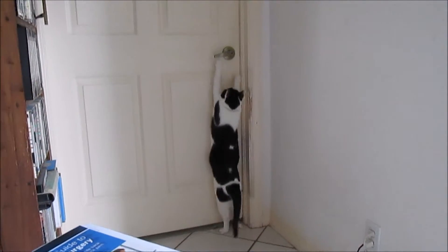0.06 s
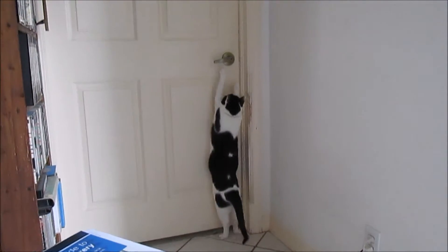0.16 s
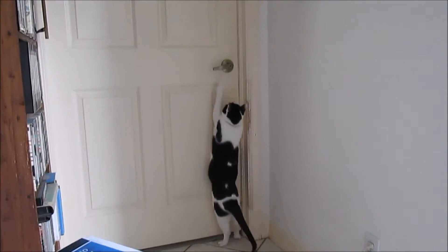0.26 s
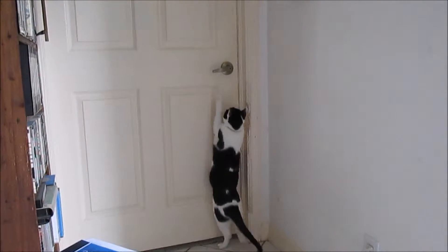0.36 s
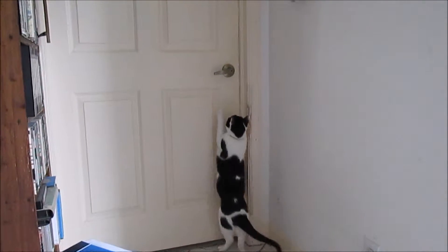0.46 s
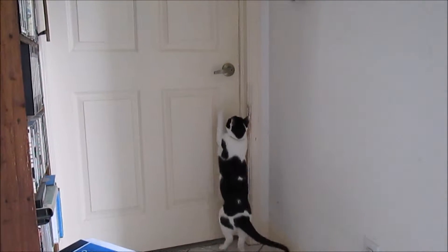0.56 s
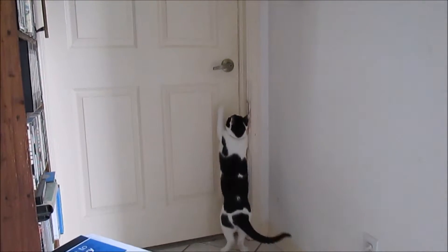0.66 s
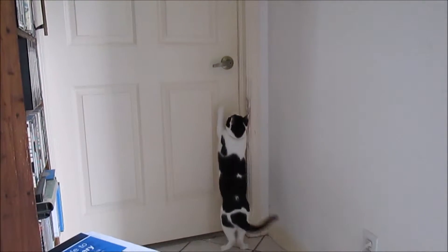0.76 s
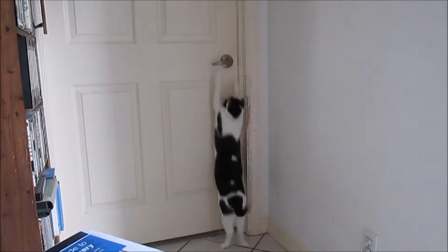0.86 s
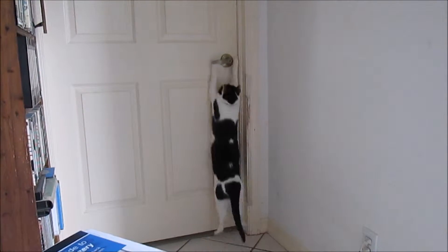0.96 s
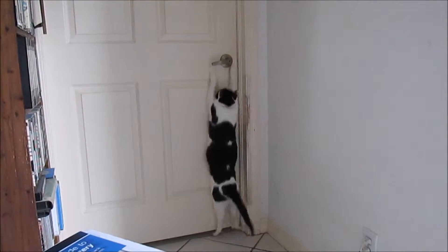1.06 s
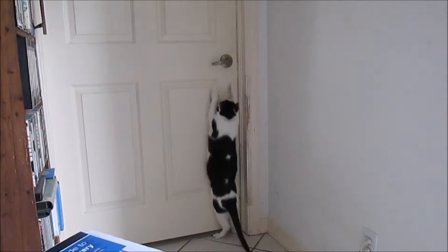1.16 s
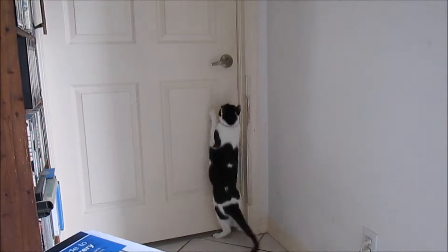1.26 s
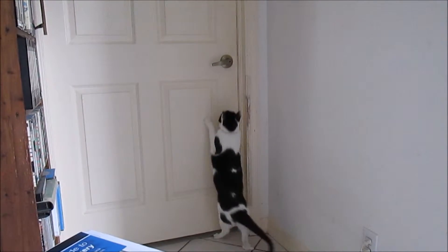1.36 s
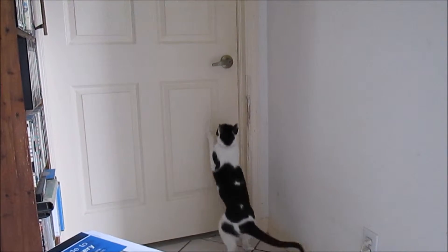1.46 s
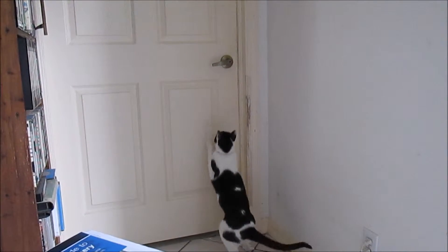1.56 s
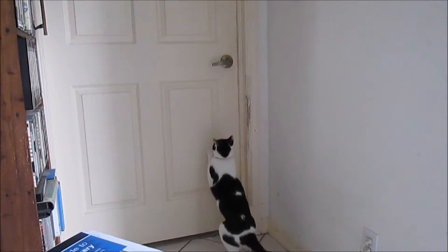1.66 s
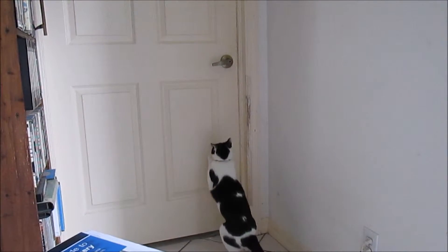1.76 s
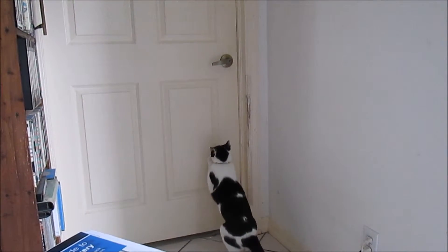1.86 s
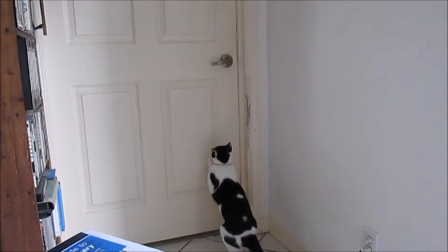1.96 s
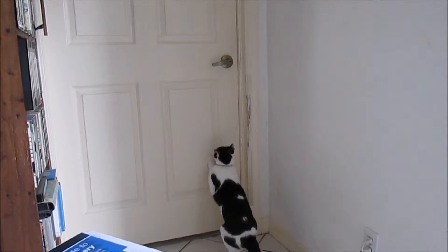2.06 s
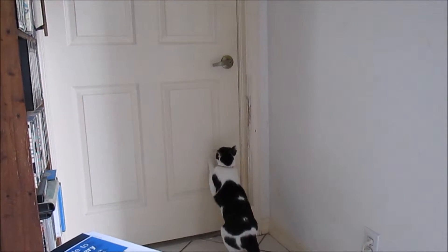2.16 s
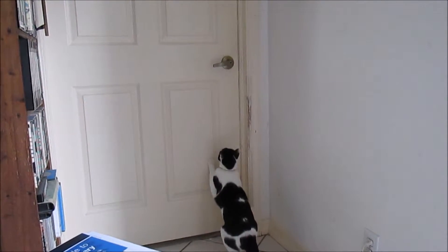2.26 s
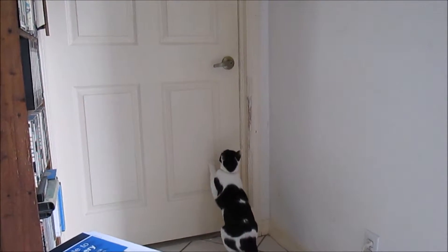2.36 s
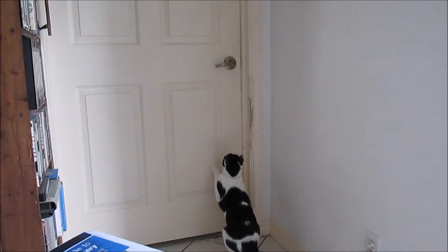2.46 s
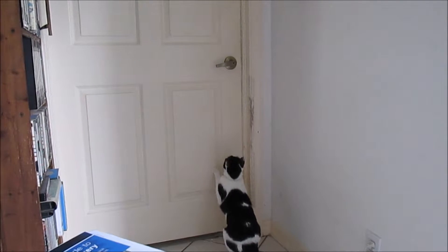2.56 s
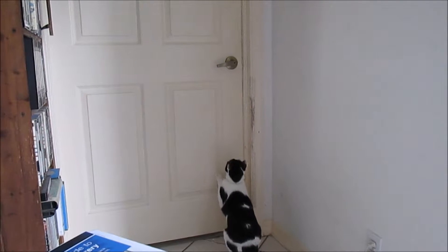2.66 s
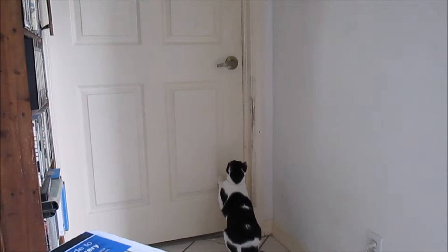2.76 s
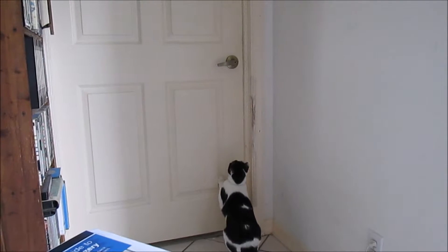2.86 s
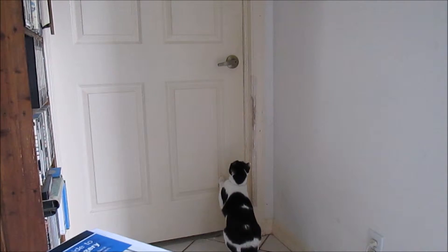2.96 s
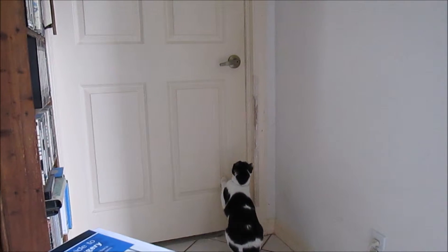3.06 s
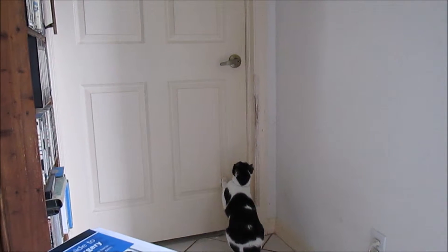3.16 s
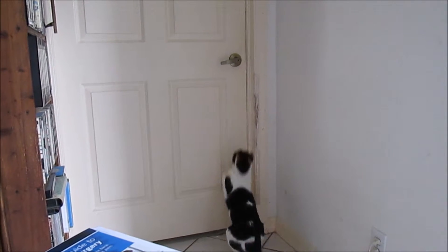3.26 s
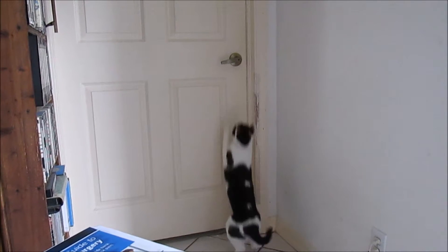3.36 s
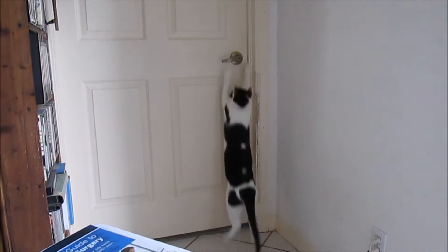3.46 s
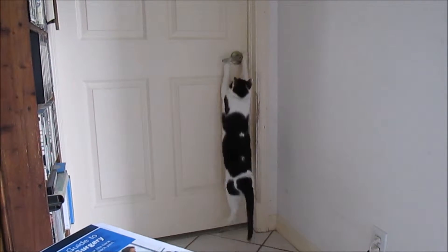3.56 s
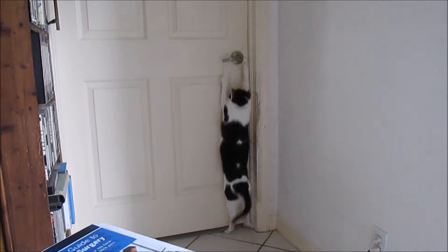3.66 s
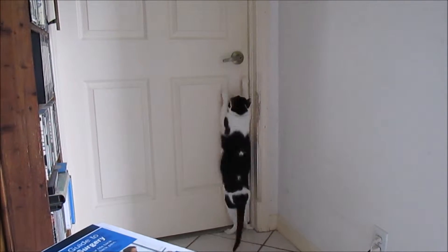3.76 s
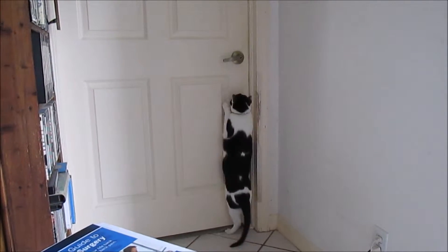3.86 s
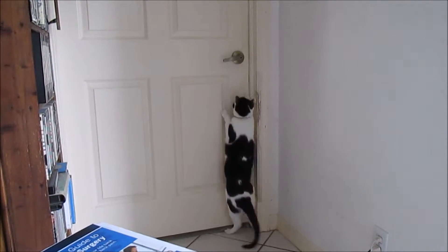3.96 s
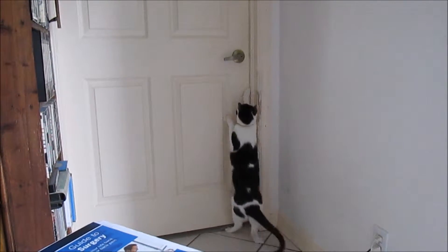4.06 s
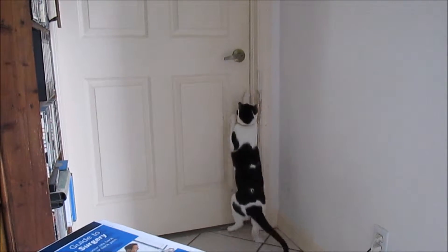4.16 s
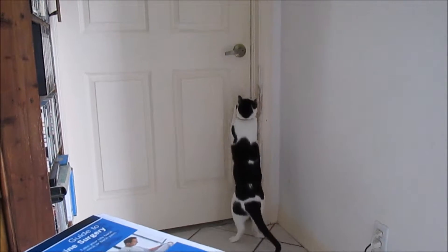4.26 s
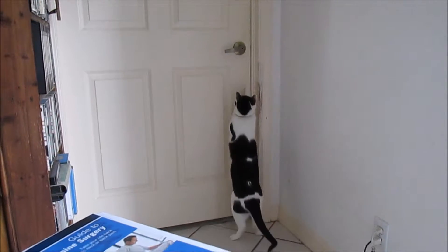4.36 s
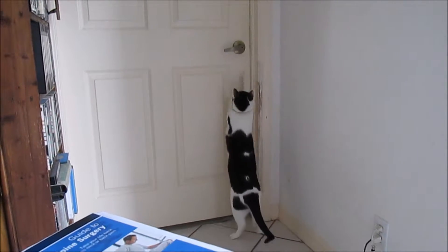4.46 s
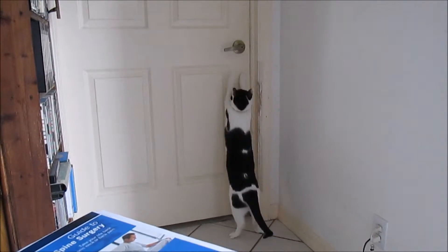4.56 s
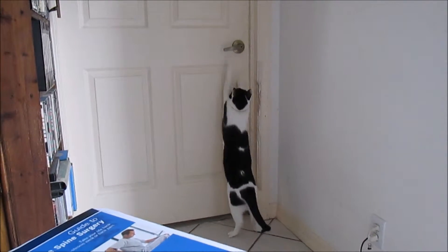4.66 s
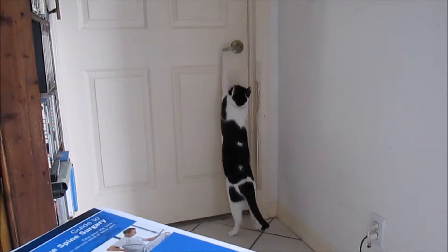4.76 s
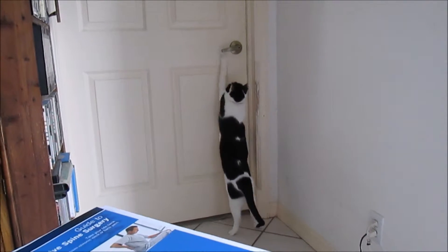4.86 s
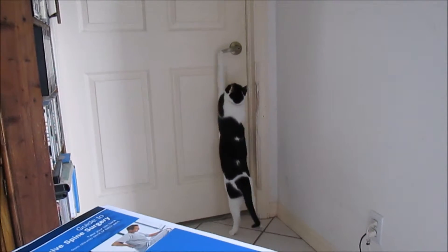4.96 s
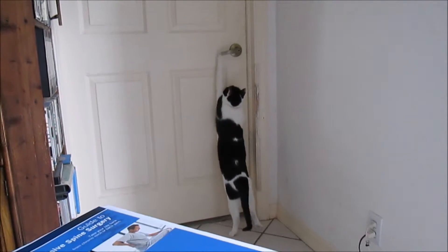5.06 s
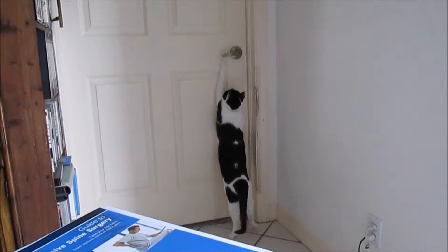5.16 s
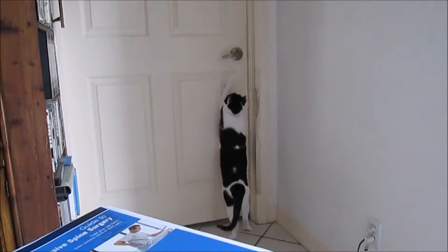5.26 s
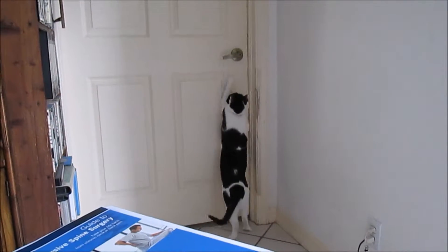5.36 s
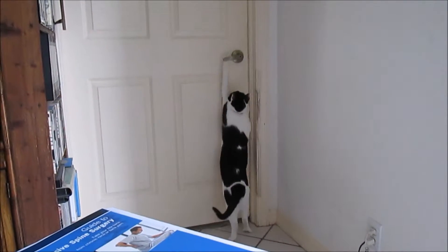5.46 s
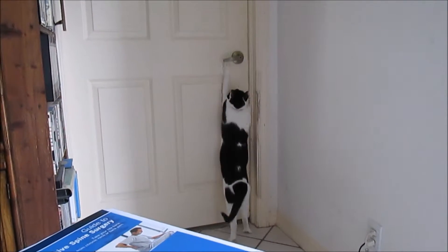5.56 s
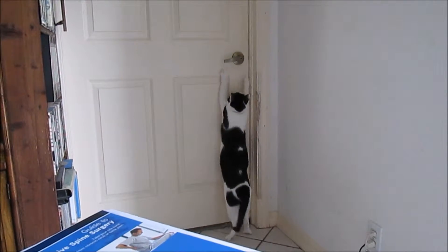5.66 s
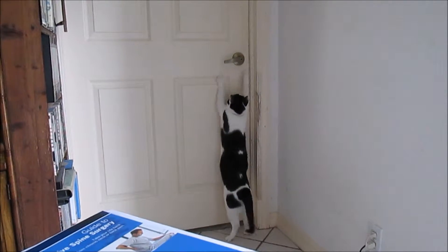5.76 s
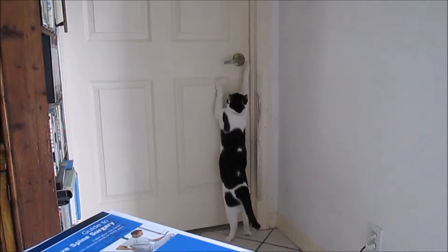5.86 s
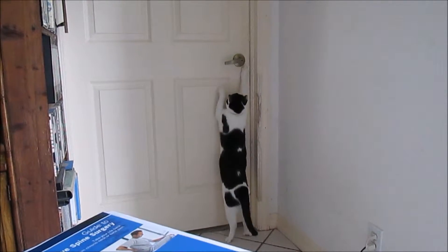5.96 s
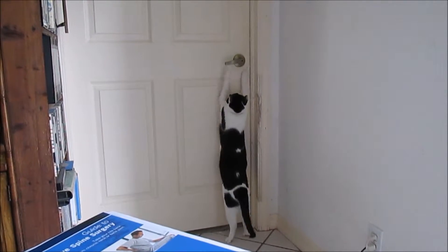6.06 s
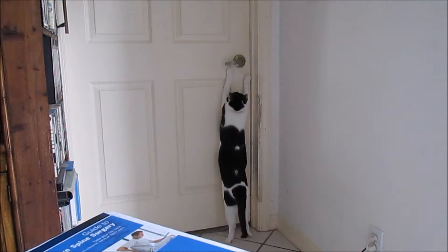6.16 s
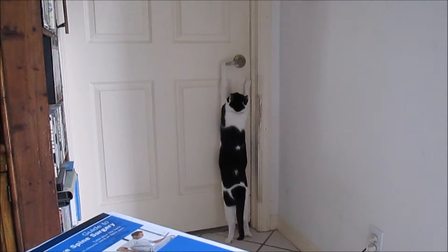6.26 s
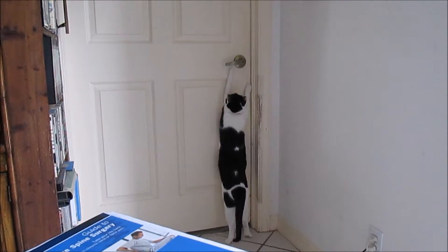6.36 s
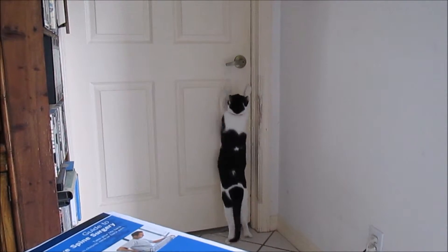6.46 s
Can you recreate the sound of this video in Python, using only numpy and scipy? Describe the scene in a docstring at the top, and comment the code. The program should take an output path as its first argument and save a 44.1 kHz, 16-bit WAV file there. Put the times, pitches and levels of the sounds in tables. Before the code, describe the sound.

A cat paws a hollow door indoors: claws tick and scrape, two bursts of knocks with a jingling collar bell, then scattered scratches over faint hum.

```python
"""A cat works at a hollow panel door in a small tiled hallway, heard in stereo from close by.
A few claw ticks and a hiss of sliding come first; at 1 s a leap knocks the panels hard and the collar bell jingles.
Light touches follow, then from 3.2 s a second flurry with more jingling, and from 4.6 s scattered paws and scratches.
Blows ring panel and bell modes, grains of noise make ticks and slides, slow sways shake the leaf.
Throughout lie the hum of the house, in shaped noise, and a thin whine, a wavering sine."""
import sys
import numpy as np
from scipy import signal
from scipy.fft import rfft, irfft, next_fast_len
from scipy.io import wavfile

SR = 44100
rng = np.random.default_rng(int(sys.argv[2]) if len(sys.argv) > 2 else 0)


def gain_from_db(level_db):
    """Turn a decibel level (scalar or array-like) into a linear amplitude factor."""
    decades = np.asarray(level_db, float) / 20
    return 10 ** decades


def dump(signal):
    """Clip the signal to [-1, 1] and save it as 16-bit WAV at the path in sys.argv[1]."""
    limited = np.clip(np.atleast_2d(signal).T, -1, 1)
    pcm = np.round(limited * 32767).astype(np.int16)
    wavfile.write(sys.argv[1], SR, pcm)


N = 286864


def door(rumble_db):
    """Every knock drives all panel modes afresh, most of all those near its place; rubbing drives the upper ones."""
    # blows of paws and knob: t/s, level/dB, brightness/(dB per octave around 600 Hz), favoured mode f/Hz
    knocks = [(0.038, -38.5, 8, 393), (0.987, -19, -12, 523), (0.995, -13, -7, 1320), (1.016, -20, -6, 535),
              (1.039, -20, -22, 630), (1.063, -18, -7, 740), (1.087, -14, -7, 604), (1.101, -6, 6, 670),
              (1.134, -17, -3, 680), (1.149, -28, -1, 664), (1.176, -26, -3, 810), (1.209, -30, 0, 810),
              (1.259, -30, 5, 1400), (1.276, -26, -18, 231), (2.569, -43, 20, 900), (2.675, -39, 4, 1150),
              (3.249, -37.5, 2, 1500), (3.429, -46, 5, 620), (3.639, -39, -10, 250), (3.756, -27, -23, 390),
              (3.764, -20, -16, 220), (3.79, -24.5, 1, 597), (3.83, -14, -13, 213), (3.842, -21.5, -5, 604),
              (3.852, -27, -26, 280), (3.897, -22.5, -20, 223), (3.949, -28.5, -33, 300),
              (4.008, -54, -8, 302), (4.078, -36, -3, 1150), (4.114, -39, -13, 236), (4.217, -43, 10, 1370),
              (4.262, -38, 16, 1260), (4.61, -32.5, 15, 1380), (4.885, -28, -4, 594), (5.057, -32, -9, 704),
              (5.163, -24, 8, 600), (5.219, -51, 0, 850), (5.574, -26.5, -9, 1250), (5.594, -25, -19, 800),
              (5.63, -25.5, -16, 380), (6.197, -28, 8, 1350), (6.225, -29, -12, 595), (6.243, -32, -6, 610),
              (6.259, -28.5, -10, 790), (6.381, -41, 3, 1280), (6.4, -17.5, 6, 630), (6.41, -21.5, 0, 970)]
    # modes of the door panels: f/Hz, level/dB, t60/s
    panels = [(206.2, -20, 0.6), (231.6, -10, 0.18), (293, -5, 0.1), (393, -2, 0.043), (480, -8, .05),
              (520, -7, 0.029), (576, -1, 0.11), (639.4, 2.5, 0.1), (715, 1.5, 0.055), (820, 6.5, 0.047),
              (970, 6, 0.059), (1116, -15, 0.15), (1087, -9.5, 0.14), (1180, 5.5, 0.027), (1341, 9, 0.026),
              (1569, -1.5, 0.016), (1580, -22, 0.055), (1844, -6.5, 0.25), (2200, -29, 0.0085)]
    hz, mode_db, t60 = np.transpose(panels)
    out = np.zeros(N)
    for s, peak_db, bright_db, place_hz in knocks:
        # a softer blow stays longer in contact: 0.37 dB of time per dB
        push_ms = 3.06 * gain_from_db(0.37 * (-12.5 - peak_db))
        force = contact(push_ms, rise_ms=0.95 * push_ms)
        level_chance, pitch_chance = rng.standard_normal((2, len(panels)))
        favour_db = 13 * np.exp(-(np.log2(hz / place_hz) / 0.22) ** 2)
        # the lowest panels answer little unless favoured
        favour_db = np.where(hz < 340, 2 * favour_db - 14.5, favour_db)
        tilt_db = bright_db * np.clip(np.log2(hz / 600), -.3, 1)
        db = mode_db + 0.84 * level_chance + tilt_db + favour_db
        # the panels hold many close modes: each blow picks slightly different ones
        picked_hz = hz * (1 + 0.029 * pitch_chance)
        sound = sum(gain_from_db(d) * peak_one(ring(force, f, t)) for d, f, t in zip(db, picked_hz, t60))
        add(out, s, gain_from_db(peak_db) * peak_one(sound))
    rub = rng.standard_normal(N) * gain_from_db(3.0 * wander(60))
    # under a rubbing paw the modes die twice as fast
    rumble = sum(gain_from_db(d) * rms_one(ring(rub, f, t / 2)) for f, d, t in panels if f > 450)
    return band(out + gain_from_db(rumble_db) * rms_one(rumble), 203, 7000)


def claws():
    """Each tick is a short skid of rough grains: a hump at its centre, a wide body and an airy top."""
    # ticks on paint, metal and tile: t/s, body level/dB, centre f/Hz, top against body/dB, skid decay/ms
    ticks = [(0.046, -34, 2500, -26, 6.9), (0.075, -41, 2500, -15, 6.6), (0.17, -33.5, 4700, -8, 3.1),
             (0.295, -45.5, 2820, -22, 8.9), (0.468, -49, 2880, -21, 4), (0.986, -26, 9540, 0, 5),
             (0.9926, -22.5, 2860, -38, 8.2), (1.0131, -21.5, 2500, -38.5, 3),
             (1.0622, -14, 5300, -29, 3.6), (1.0909, -8.5, 3000, -10, 4.6), (1.1018, -4, 2780, -8, 4.2),
             (1.1394, -21, 2400, -23, 6.6), (1.169, -29, 2630, -17.5, 4.1), (1.256, -26, 7860, -1, 8.3),
             (1.338, -28, 4750, -32, 4.3), (1.4256, -31, 3700, -28, 15), (1.4427, -31.5, 5330, -25, 5.7),
             (1.508, -42, 5470, -21, 13), (1.7678, -32, 2420, -9, 5.1), (1.9123, -43.5, 4880, -6, 5.2),
             (2.5667, -40.5, 2480, -31, 5.6), (2.6999, -37, 3440, -30, 14), (2.7188, -40, 4350, -18, 7.8),
             (3.247, -42, 2200, -13, 4.6), (3.263, -45, 6070, -24, 9.4), (3.3032, -39, 6100, -34, 11),
             (3.4, -25, 5600, -32, 1.5), (3.4276, -35.5, 5800, -24, 4.7), (3.5342, -39, 7600, -22, 5.1),
             (3.5725, -37, 5730, -31, 6.0), (3.637, -33, 4870, -21, 12), (3.68, -23, 5430, -34, 7.6),
             (3.7209, -26, 3320, -29, 20), (3.7658, -22, 5400, -26, 6.2), (3.834, -21.5, 2610, 3, 8.9),
             (3.85, -21, 5800, 6.5, 7.5), (3.8994, -45, 5680, -8, 6.0), (3.9738, -28, 6550, -3, 2.9),
             (4.0069, -29.5, 2780, -9, 13.6), (4.102, -33.5, 3240, -40, 7.7), (4.16, -34.5, 5900, -29, 6.0),
             (4.183, -46, 5460, -35, 3.9), (4.6073, -21.5, 4900, -4, 10), (4.7386, -37, 5400, -8, 5.6),
             (4.8838, -18.5, 6430, -8, 5.4), (4.9056, -27, 3230, -17, 4.2), (5.163, -24.5, 3180, -33, 2.5),
             (5.192, -32, 3500, -19, 3.5), (5.5555, -43, 2230, -20, 5.7), (5.6024, -20, 3380, -36, 3.4),
             (5.677, -35, 3280, -1, 15), (5.8282, -22, 4800, -45, 5.9), (6.0398, -32.5, 2510, -31, 8.3),
             (6.1692, -35, 6180, -1, 12), (6.1927, -34, 2920, -9, 2.9), (6.222, -18.5, 3100, -23, 2.8),
             (6.2485, -32, 3700, -25, 11), (6.399, -25.5, 3500, -14, 7.5), (6.408, -25.5, 3300, -7, 3.3)]
    out = np.zeros(N)
    for s, peak_db, hz, top_db, skid_ms in ticks:
        force = contact(skid_ms, rise_ms=0.18 * skid_ms)
        body = band(force, hz / 1.14, hz * 1.2) + .5 * band(force, 1060, 8070)
        top = band(force, 5400, 20400)
        add(out, s, gain_from_db(peak_db) * (peak_one(body) + gain_from_db(top_db) * peak_one(top)))
    return out


def bell():
    """Each blow of the pea is a touch and a weaker bounce; it reaches every mode with a strength of its own."""
    # blows in the collar bell: t/s, then level/dB of the main, low and top family
    jingles = [(0.022, -48, -51, -59), (0.347, -75, -45, -75), (0.449, -75, -49, -75),
               (0.902, -56, -51.5, -48), (0.9633, -55, -35.5, -50), (1.0908, -21, -22.5, -34),
               (1.15, -35, -36, -40), (1.182, -37, -48, -42), (1.2447, -26.5, -36, -35),
               (1.2584, -26.5, -48, -43), (1.661, -66, -46.5, -72), (1.704, -64, -45, -67),
               (3.3487, -42, -43, -56), (3.3856, -44, -34, -42), (3.404, -38, -38.5, -39),
               (3.4386, -43, -43, -46), (3.482, -45, -50, -47), (3.5343, -41, -39.5, -52),
               (3.5724, -35.5, -35.5, -46), (3.616, -43, -47.5, -57), (3.6808, -32, -23.5, -39),
               (3.693, -31, -20, -35), (3.727, -16, -38, -28), (3.771, -35, -46, -48),
               (3.795, -36, -49, -31), (3.8082, -29, -39, -33), (3.8486, -18.5, -25, -16),
               (3.8644, -46, -45, -48), (3.919, -39, -53, -39), (3.974, -44, -50, -50),
               (4.1728, -54, -31, -47), (4.2368, -56, -48, -46), (5.4494, -66, -46, -69),
               (5.47, -61, -41, -61), (5.68, -40, -45, -36), (6.0806, -49, -46, -55),
               (6.2786, -50, -48, -45)]
    # bell modes in four families (main, low, middle, top): f/Hz, level/dB, t60/s
    families = [
        [(11465, -3, 0.059), (11630, -5.5, 0.045)],
        [(5596, -6, 0.029), (5810, -7, 0.037), (6350, -11, 0.039)],
        [(7250, 3, 0.036)],
        [(12075, -0.5, .044), (12260, -8, 0.035)],
    ]
    out = np.zeros(N)
    for s, main_db, low_db, top_db in jingles:
        touch = contact(1.77, rise_ms=0.95)
        bounce = np.roll(contact(0.91, rise_ms=0.48), rng.integers(150, 900))   # delay in samples
        force = touch + 0.63 * bounce
        middle_db = main_db - 15.5
        for modes, peak_db in zip(families, [main_db, low_db, middle_db, top_db]):
            for hz, db, t60 in modes:
                pitch_chance, level_chance = rng.standard_normal(2)
                sound = ring(force, hz * (1 + 0.003 * pitch_chance), t60)
                sound = band(sound, hz * .96, hz * 1.04)
                add(out, s, gain_from_db(peak_db + db + 3.1 * level_chance) * peak_one(sound))
    return out


def strokes():
    """Hiss dB, rumble dB and rasp Hz of the stroke under way; each slides until the next takes hold."""
    # pads and claws slide over the door: t/s, hiss level/dB, fade/(dB/s, negative grows),
    # wood rumble level/dB, rasp f/Hz
    slides = [(0.0, -40, 165, -57, 3250), (0.165, -59, 150, -51, 4500), (0.987, -27, 268, -19.5, 3230),
              (1.049, -36.5, -150, -30.5, 4500), (1.091, -31, 100, -23.5, 3100),
              (1.249, -41.5, 78, -37, 4550), (1.423, -41.5, 163, -49, 4440), (1.77, -41.5, 168, -53, 2880),
              (2.69, -48, 198, -63, 3300), (3.246, -50, 200, -62, 3500), (3.3, -52, 60, -69, 5500),
              (3.39, -48, 102, -63, 5700), (3.568, -45.5, 152, -78, 5930), (3.64, -47.5, -100, -56, 5350),
              (3.75, -32.5, 155, -32.5, 5100), (3.83, -31.5, 123, -34.5, 4930),
              (3.998, -42, 117, -48, 3080), (4.172, -43.5, 297, -49, 5790), (4.22, -49, 104, -47, 4040),
              (4.606, -35.5, 44, -59, 5070), (4.689, -45.5, 160, -55, 4950), (4.74, -52.5, 15, -58, 4840),
              (4.883, -34, 125, -44.5, 4100), (5.168, -38.5, 250, -38.5, 3370),
              (5.2, -40, -55, -46.5, 3230), (5.302, -39, 72, -40.5, 3400), (5.343, -44.5, 118, -47, 3600),
              (5.56, -58, -300, -47.5, 2500), (5.595, -36, 136, -38.5, 4050), (5.668, -37, 40, -48.5, 3745),
              (5.827, -36, 195, -46, 4000), (5.89, -47, -110, -60, 4530), (5.96, -39.5, 59, -46.5, 3500),
              (6.04, -44.5, 81, -58, 3500), (6.22, -31.5, 152, -35.5, 3690), (6.34, -45, -4, -47, 3640),
              (6.4, -47, 113, -37, 3740)]
    s, hiss_db, fade, wood_db, rasp_hz = np.transpose(slides)
    t = np.arange(N) / SR
    now = np.maximum(np.searchsorted(s, t, "right") - 1, 0)
    faded_db = fade[now] * (t - s[now])
    # the rumble fades almost like the hiss
    gains = gain_from_db(np.array([hiss_db[now] - faded_db, wood_db[now] - 1.04 * faded_db]))
    grip_s = .007   # time constant in which a stroke takes hold
    r = np.exp(-1 / (grip_s * SR))
    hiss_db, rumble_db = 20 * np.log10(signal.lfilter([1 - r], [1, -r], gains) + 1e-9)
    return hiss_db, rumble_db, rasp_hz[now]


def slide(hiss_db, rasp_hz):
    """Dense grains of fur and claw on paint, catching unevenly; the claw tip rasps at a pitch set by its angle."""
    # hiss of the paint: f/Hz, relative level/(dB per Hz)
    paint = [(880, -22), (1500, -5), (2340, -9.5), (3170, -3.5), (3980, -9.5), (5240, -6.5), (8010, -11),
             (8660, -10), (10300, -17.5), (12100, -13.5), (15800, -23.5)]
    # the painted skin rings under a sliding claw: f/Hz, level/dB, t60/s
    skin_modes = [(3105, 0, 0.03), (3500, -16, 0.016), (3947, -10, 0.019), (4950, -3, 0.0084),
                  (5220, -4.5, 0.034), (5580, -5, .02)]
    catch_db = 2.0 * wander(90)
    grain_db = 2.0 * np.minimum(rng.exponential(1, N), 5)
    grains = rng.standard_normal((2, 2, N)) * gain_from_db(grain_db + catch_db)
    likeness = [(1500, 0.71), (4000, 0.52), (15000, 0.12)]   # f/Hz, left-right likeness
    hiss = coloured(grains, paint, likeness, patchy_db=4.0, rasp_hz=rasp_hz, rasp_db=8.0)
    skin = 0
    for hz, db, t60 in skin_modes:
        away_db = 17.0 * np.abs(np.log2(hz / rasp_hz))   # modes away from the rasp ring less
        skin = skin + gain_from_db(db + 5.5 * wander(14) - away_db) * rms_one(ring(grains[0], hz, t60))
    skin = skin[0] + 0.31 * skin[1] * [[1], [-1]]
    return gain_from_db(hiss_db) * (hiss + gain_from_db(-7.5) * skin)


def shudder(sway_hz, deep_hz):
    """The cat's weight jolts the leaf in its frame: two slow sways, each a sine with noise, and a dull thud."""
    # jolts of the leaf: t/s, sway level/dB, thud level/dB, swell/s
    jolts = [(0.0, -55, -47.5, 0.0033), (1.0, -44.5, -41.5, 0.086), (1.2, -44.5, -53, 0.07),
             (3.74, -36, -34, 0.014), (3.84, -49.5, -46, 0.074), (4.87, -51.5, -45, 0.018),
             (5.16, -76, -53, 0.017), (5.57, -54.5, -51, 0.035), (6.2, -57, -46, 0.028),
             (6.39, -75, -56, .02)]
    sway_gain = deep_gain = thud_gain = 0
    for s, sway_db, thud_db, swell_s in jolts:
        sway_gain = sway_gain + swell_and_fade(s, sway_db, swell_s, 64)
        # the deep sway is weaker, later and longer
        deep_gain = deep_gain + swell_and_fade(s, sway_db - 11.5, swell_s + 0.22, 29)
        thud_gain = thud_gain + swell_and_fade(s, thud_db, swell_s, 57.5)
    t, noise = np.arange(N) / SR, rng.standard_normal((3, N))
    sway = np.sqrt(2) * np.sin(2 * np.pi * sway_hz * t) + .5 * rms_one(band(noise[0], 50, 110))
    deep = np.sqrt(2) * np.sin(2 * np.pi * deep_hz * t) + 1.1 * rms_one(band(noise[1], 16.4, 40))
    thud = rms_one(band(noise[2], 49, 285))
    return sway_gain * sway + deep_gain * deep + thud_gain * thud


def hall(x):
    """Sound between the walls: eight feedback delays a side, duller on every round."""
    t60_s, wall_cut_hz = 0.4, 10500   # t60 of the bass; the treble dies sooner
    size = next_fast_len(N + SR)
    turn = np.exp(-2j * np.pi * np.arange(size // 2 + 1) / size)   # one sample of delay
    dull = np.exp(-2 * np.pi * wall_cut_hz / SR)
    response = np.zeros((2, len(turn)), complex)
    for k, lag in enumerate((rng.uniform(.006, .03, 16) * SR).astype(int)):
        loss = gain_from_db(-60 * lag / SR / t60_s)
        loop = loss * turn ** lag * (1 - dull) / (1 - dull * turn)
        response[k % 2] += loop / (1 - loop) * (-1) ** (k // 2)
    return irfft(rfft(x, size) * response, size)[:, :N]


def house():
    """Nearly steady hum and hiss of shaped noise with a few humps, and a thin whine of a wavering sine."""
    # spectrum of the hum: f/Hz, relative level/(dB per Hz)
    hum = [(12, -41), (20, -7), (77, -4), (113, -4), (150, -11), (177, -1), (248, -3.5), (347, -5),
           (388, -8.5), (678, -10), (1370, -15.5), (2670, -25), (2910, -23), (6180, -26.5), (16000, -35.5)]
    # left-right likeness of the hum: f/Hz, likeness (held within 0 to 1)
    hum_likeness = [(60, 0.62), (180, 0.73), (550, 0.67), (1650, 0.33), (4970, -3.6), (15000, 0.59)]
    # humps in the hum: f/Hz, width/Hz, level/dB
    humps = [(121.5, 17, -63), (186.6, 27, -60), (244.3, 18, -60.5), (291.3, 24, -60.5), (6380, 680, -76)]
    out = gain_from_db(-50) * coloured(rng.standard_normal((2, 2, N)), hum, hum_likeness, patchy_db=0.86)
    for hz, width_hz, db in humps:
        out = out + gain_from_db(db) * rms_one(band(rng.standard_normal(N), hz - width_hz / 2, hz + width_hz / 2))
    turns = np.cumsum(6035 + 6.15 * wander(30)) / SR   # whine around 6035 Hz
    whine = np.sqrt(2) * np.sin(2 * np.pi * turns)
    return out + gain_from_db(-74 + 1.8 * wander(18)) * whine


def contact(length_ms, rise_ms):
    """A rough contact: uneven grains that swell quickly and die away, both with the given time constants."""
    t = np.arange(6144) / SR
    grains = rng.standard_normal(len(t)) * gain_from_db(2.0 * np.minimum(rng.exponential(1, len(t)), 5))
    return grains * (1 - np.exp(-1000 * t / rise_ms)) * np.exp(-1000 * t / length_ms)


def ring(force, hz, t60):
    """A two-pole resonator: a unit click sets a sine of height 1 ringing, 60 dB down after t60 seconds."""
    r, w = gain_from_db(-60 / (t60 * SR)), 2 * np.pi * hz / SR
    return signal.lfilter([0, np.sin(w)], [1, -2 * r * np.cos(w), r * r], force + 1e-18)


def coloured(white, spectrum, likeness, patchy_db, rasp_hz=1000, rasp_db=0):
    """Third-octave bands of stereo noise, each with its level, patches and likeness, and a moving hump; rms 1."""
    out, edges = 0, 18 * 2 ** (np.arange(31) / 3)
    for k, (low, high) in enumerate(zip(edges, edges[1:])):
        mid, side = band(white[k % 2], low, high)
        hz = np.sqrt(low * high)
        alike = np.clip(at_hz(likeness, hz), 0, 1)
        wide = np.sqrt(1 + alike) * mid + np.sqrt(1 - alike) * side * [[1], [-1]]
        hump_db = rasp_db * np.exp(-(np.log2(hz / rasp_hz) / 1.74) ** 2)
        out = out + gain_from_db(at_hz(spectrum, hz) + hump_db + patchy_db * wander(25)) * wide
    return rms_one(out)


def swell_and_fade(s, peak_db, swell_s, fade_db_per_s):
    """Gain that swells to its peak, then falls steadily in dB."""
    t = np.arange(N) / SR - s
    return np.clip(t / swell_s, 0, 1) * gain_from_db(peak_db - fade_db_per_s * np.maximum(t - swell_s, 0))


def wander(rate):
    """Slow chance: normal random knots of spread 1, rate of them a second, joined by lines."""
    knots = rng.standard_normal(int(N / SR * rate) + 2)
    return np.interp(np.arange(N) * rate / SR, np.arange(len(knots)), knots)


def band(x, low_hz, high_hz):
    """Gentle band-pass."""
    return signal.sosfilt(signal.butter(2, [low_hz, min(high_hz, .45 * SR)], "band", fs=SR, output="sos"), x)


def at_hz(points, hz):
    """Read a table on a log-frequency axis."""
    table_hz, values = np.transpose(points)
    return np.interp(np.log(hz), np.log(table_hz), values)


def add(out, s, sound):
    """Mix a short sound in at a time in seconds."""
    i = round(s * SR)
    out[..., i:i + sound.shape[-1]] += sound[..., :N - i]


def peak_one(x):
    """Scale to unit peak."""
    return x / np.abs(x).max()


def rms_one(x):
    """Scale to unit rms."""
    return x / np.sqrt(np.mean(x ** 2) + 1e-20)


def scene():
    """All sources at the door, close to the microphones, with the hall around them and the house below."""
    hiss_db, rumble_db, rasp_hz = strokes()
    wood, taps, jingle = door(rumble_db), claws(), bell()
    # left and right gains in dB: wood and claws a little right, bell left
    near = wood * gain_from_db([[-.5], [.5]]) + taps * gain_from_db([[-.7], [.7]]) + jingle * gain_from_db([[1.5], [-1.5]])
    near = near + slide(hiss_db, rasp_hz)
    left, right = near + gain_from_db(-18) * hall(wood + taps + jingle)
    mid, side = (left + right) / 2, (left - right) / 2
    # close microphone ports: the bass of both sides is drawn together, the treble spread
    side = signal.lfilter(*signal.butter(1, 2000.0, "high", fs=SR), side) + 0.57 * side
    # the door lies a little right: the left port hears it later
    port_lag_s = .000014
    turn = np.exp(-2j * np.pi * np.fft.rfftfreq(N, 1 / SR) * port_lag_s)
    late_left = irfft(rfft(mid + side) * turn, N)
    return np.array([late_left, mid - side]) + shudder(sway_hz=47.0, deep_hz=23.2) + house()


def band_limit(x):
    """A steep low-pass at the top of the band."""
    return signal.sosfilt(signal.butter(12, 16940, fs=SR, output="sos"), x)


def record(dry):
    """The top of the mix is cut steeply, 40 dB down from 16536 Hz."""
    cut = signal.sosfilt(signal.cheby2(10, 40, 16536, fs=SR, output="sos"), dry)
    return band_limit(cut)


dry = scene()
out = record(dry)
dump(out)
```